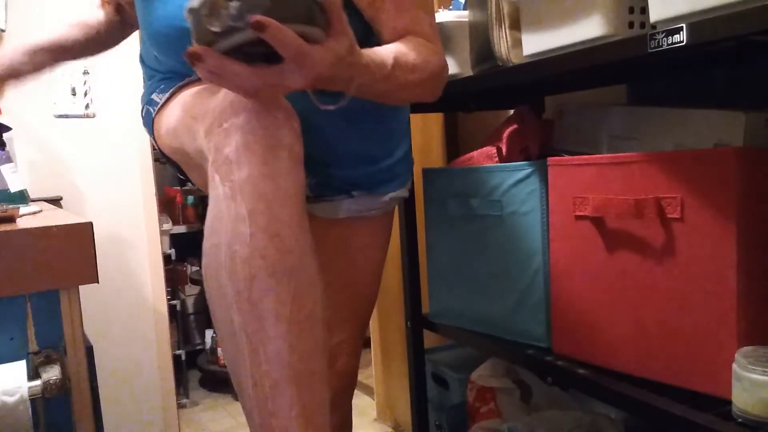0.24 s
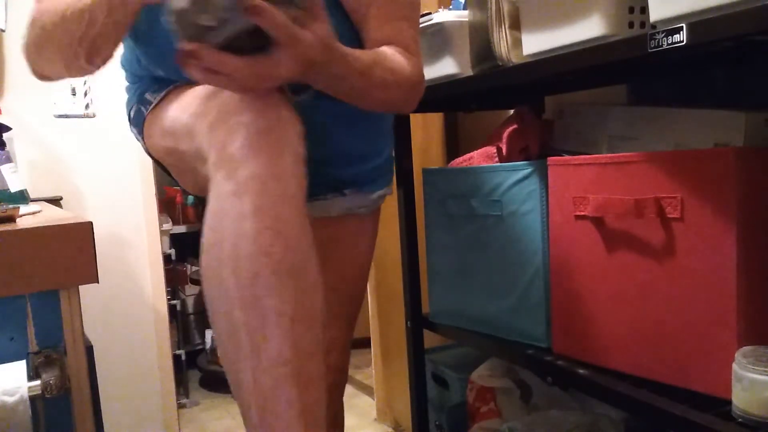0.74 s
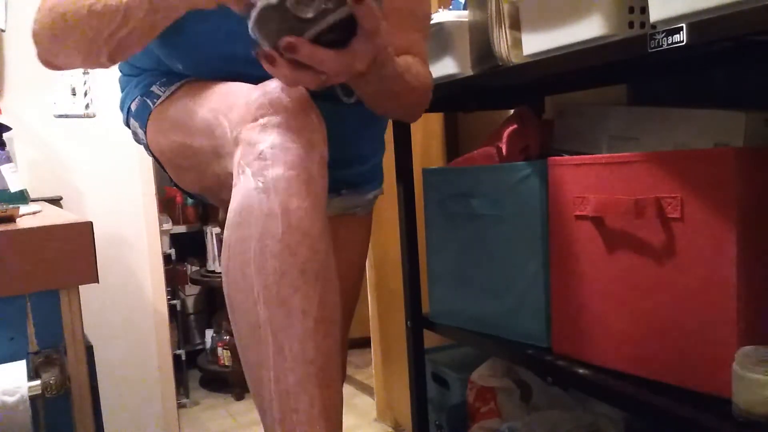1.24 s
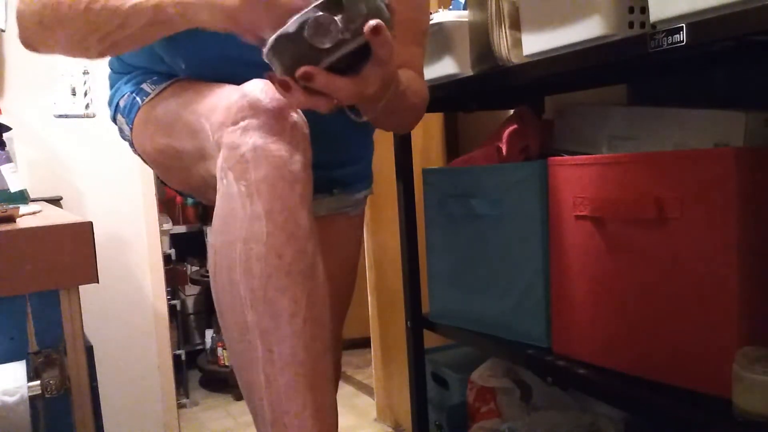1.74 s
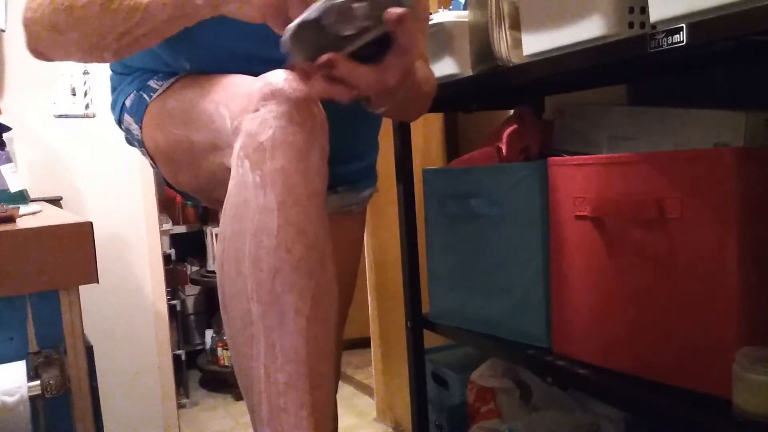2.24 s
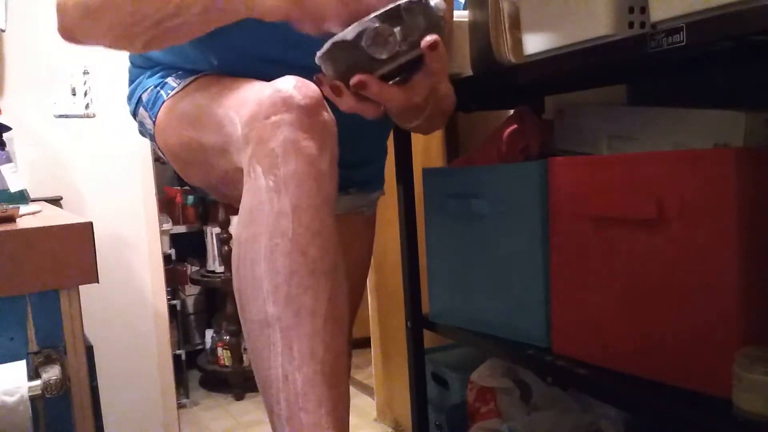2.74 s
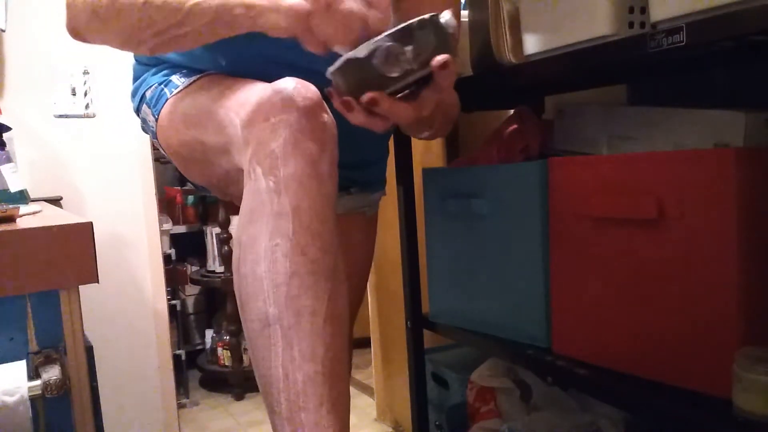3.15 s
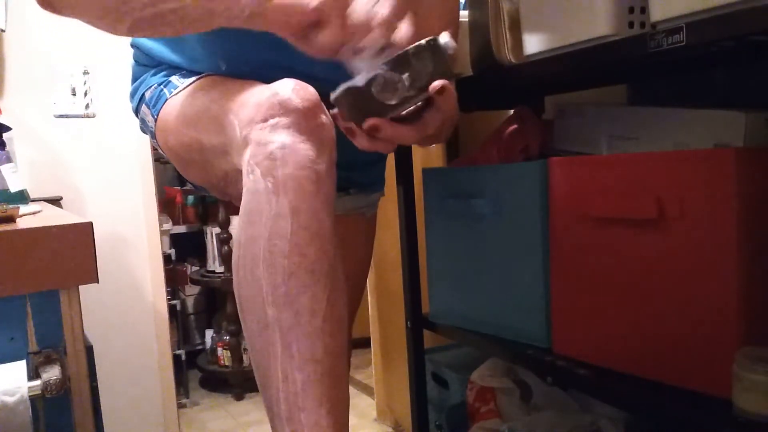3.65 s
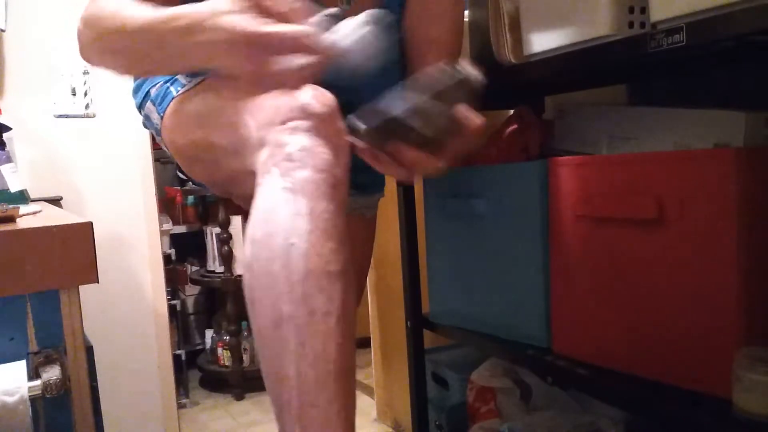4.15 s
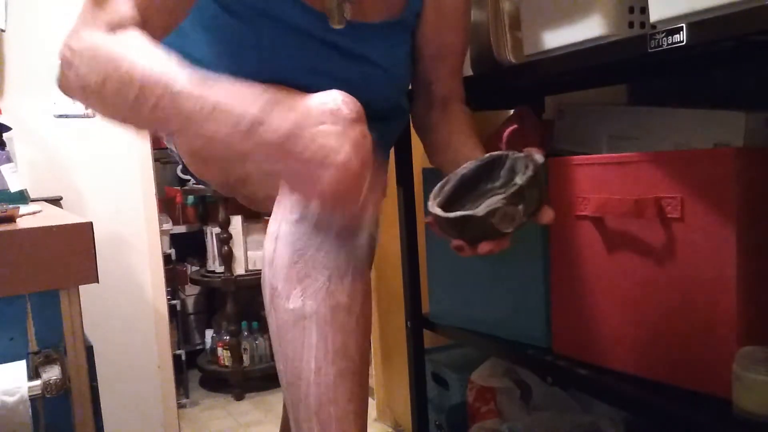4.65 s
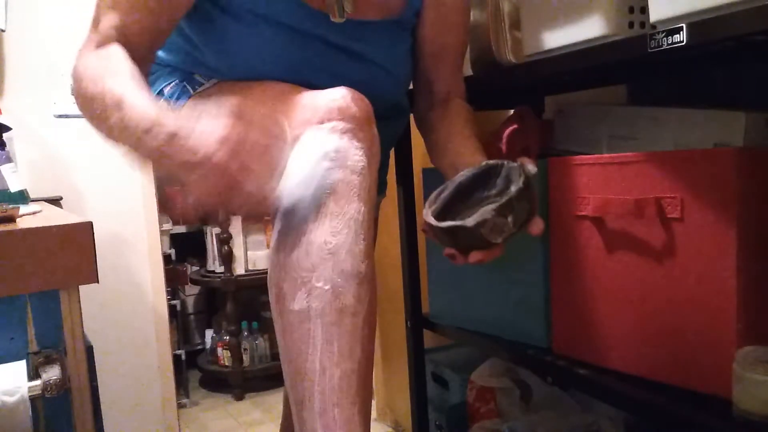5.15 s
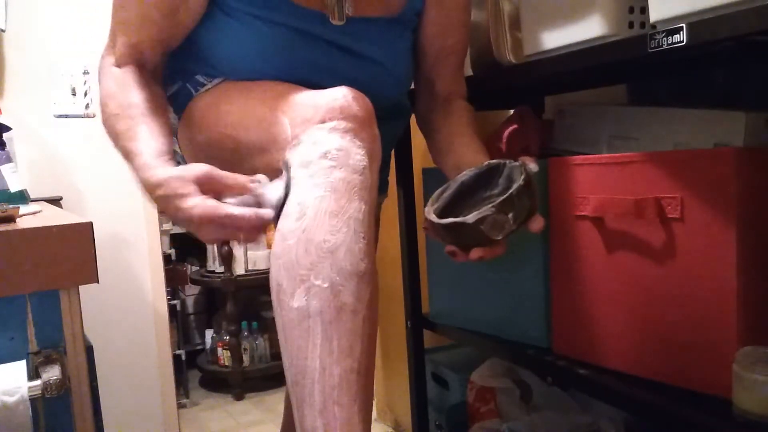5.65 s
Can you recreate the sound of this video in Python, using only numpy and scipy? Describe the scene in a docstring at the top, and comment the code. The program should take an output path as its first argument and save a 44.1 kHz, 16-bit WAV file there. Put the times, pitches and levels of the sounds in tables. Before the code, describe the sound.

Close, hollow-sounding stereo pickup of a shaving brush whisking lather in a bowl: scratchy wet to-and-fro swishes with foam fizz. The handle cracks against the bowl twice, the first knock loudest, each with a very short ring. After four seconds the brush dabs and scrubs bare skin more softly, ending in slow sweeps over low room hum and hiss.

```python
"""A shaving brush swirls in a soap bowl, then works over a lathered leg, in a small room.
It lands with soft pops and scrubs quickly; light handle taps lead to hard knocks on the bowl at 1.3 and 2.0 s.
More scrubbing and slow sweeps follow; from 4 s the brush pops, scrubs and sweeps on the leg.
Strokes are filtered grains of noise, knocks are a filtered click plus ringing tones, landings are short noise.
Room echoes and steady noise surround it all; a camera's stereo widening hollows the sound."""
import sys
import numpy as np
from scipy import signal
from scipy.fft import rfft, irfft
from scipy.io import wavfile

SR = 44100
rng = np.random.default_rng(int(sys.argv[2]) if len(sys.argv) > 2 else 0)


def int16_out(signal):
    """Quantize to a 16-bit WAV file."""
    q = np.round(np.clip(np.atleast_2d(signal).T, -1, 1) * 32767)
    wavfile.write(sys.argv[1], SR, q.astype(np.int16))


N = 259749  # length in samples
TIME = np.arange(N) / SR  # seconds


def amp(db):
    """Turns decibels into a plain multiplier."""
    return 10 ** (np.asarray(db) / 20)


def unit(x):
    """Scales to rms 1."""
    return x / np.sqrt(np.mean(x ** 2) + 1e-20)


def read(points, hz):
    """Joins points by straight lines on a log-frequency axis."""
    f, value = np.transpose(points)
    return np.interp(np.log(hz + 1), np.log(f + 1), value)


def add(mix, s, sound):
    """Lays a sound into the mix at time s."""
    part = mix[round(s * SR):][:len(sound)]
    part += sound[:len(part)]


def colour(x, spectrum, peaks=(), size=4096):
    """Filters with a smooth spectrum and resonant peaks on top, with no sound ahead of its cause."""
    hz = abs(np.fft.fftfreq(size, 1 / SR))
    db = read(spectrum, hz)
    for f, width, gain in peaks:
        db = db + gain / (1 + (2 * (hz - f) / width) ** 2)
    # the Hilbert transform finds the phase that makes the filter respond as early as it can
    minimum_phase = np.exp(np.conj(signal.hilbert(np.log(amp(db)))))
    response = np.fft.ifft(minimum_phase).real
    return signal.oaconvolve(x, response[:size // 2])[:len(x)]


def drift(per_s):
    """Random wandering of rms 1, with per_s new values a second joined by straight lines."""
    knots = np.arange(0, N / SR + 1, 1 / per_s)
    return unit(np.interp(TIME, knots, rng.standard_normal(N)[:len(knots)]))


def diffuse(length, spacing_m=0.14, likeness=0.93):
    """White sound from all directions at two microphones: most alike at long wavelengths."""
    a, b = rfft(rng.standard_normal((2, length)))
    hz = np.fft.rfftfreq(length, 1 / SR)
    same = np.clip(likeness, 0, 1) * np.sinc(2 * hz * spacing_m / 343)  # 343 m/s: speed of sound
    other = same * a + np.sqrt(1 - same ** 2) * b
    return irfft(np.array([a, other]), length)


def grains(per_s, spread_db, smooth):
    """Tiny snaps of uneven size over the smooth hiss of countless smaller ones."""
    happens = rng.random(N) < per_s / SR
    sign = rng.choice([-1, 1], N)
    size = amp(spread_db * np.minimum(rng.exponential(1, N), 4))
    return unit(unit(happens * sign * size) + smooth * rng.standard_normal(N))


# Single sweeps and slow presses. Each row: time of its height in seconds, level in dB before the brush gains,
# nominal length in seconds, bristle fizz in dB relative to the swish.
SINGLE_SWEEPS = [(0.49, -57, 0.32, -0.5), (1.965, -51.5, 0.36, -3), (3.42, -55.5, 0.39, 3.5),
                 (3.6, -54.5, 0.4, -2), (3.86, -62, 0.34, -18), (4.046, -55.5, 0.06, 0.5),
                 (4.16, -56, 0.24, 1.5), (5.345, -57.5, 0.079, 4.5), (5.49, -58, 0.28, 0.5),
                 (5.677, -52, 0.054, -4), (5.81, -56.5, 0.51, 3)]
# Spells of scrubbing to and fro. Each row: first stroke in seconds, last stroke in seconds, number of strokes,
# quickening from 0 to 1, extra return-stroke level in dB, bristle fizz in dB relative to the swish.
SCRUB_SPELLS = [(0.575, 1.267, 9, 0.03, -4.5, -5.5), (1.425, 1.882, 5, 0.08, -2, -5),
                (2.171, 3.141, 11, 0.1, -2.5, -3.5), (4.279, 5.193, 11, 0.06, 0.5, -2)]
# How hard the hand scrubs. Each row: time in seconds, level in dB before the return-stroke change and brush gains.
SCRUB_EFFORT = [(0.58, -44.5), (1.02, -43.5), (1.22, -38), (1.42, -48), (1.54, -45.5), (1.65, -51.5),
                (1.89, -48), (2.28, -44), (2.5, -46), (2.8, -42.5), (3.14, -48), (4.36, -45.5), (4.48, -52),
                (4.57, -45.5), (4.8, -52.5), (5.02, -51.5), (5.19, -58)]
SCRUB_SHARE = 0.81  # nominal length of a quick stroke as a share of the average beat


def strokes():
    """Lists the hand's motion: sweeps, and scrubs on a slowly quickening beat, return and push in turn."""
    rows = list(SINGLE_SWEEPS)
    for first, last, count, quickening, return_db, fizz_db in SCRUB_SPELLS:
        u = np.linspace(0, 1, round(count))
        beat_s = (last - first) * u[1]
        times = first + (last - first) * (u + quickening * u * (1 - u))
        for k, s in enumerate(times):
            level_db = np.interp(s, *np.transpose(SCRUB_EFFORT))
            if k % 2 == 0:
                level_db = level_db + return_db
            rows.append((s, level_db, SCRUB_SHARE * beat_s, fizz_db))
    return rows


# Tone of the wet swish. Each row: frequency in Hz, level in dB.
SWISH_TONE = [(100, -41), (300, -1), (480, -7), (650, 0.5), (800, -1.5), (950, -2.5), (1200, -1.5),
              (1600, -4.5), (2200, -5), (3000, -12.5), (5000, -13), (14000, -29.5)]
# Air in the bowl under the hand. Each row: frequency in Hz, width in Hz, boost or cut in dB.
BOWL_AIR = [(806.5, 28, 11), (1098, 27, 7), (1348, 200, 3), (2400, 1000, 3), (3950, 83, -6)]
# Tone of bristles and bursting foam. Each row: frequency in Hz, level in dB.
FIZZ_TONE = [(500, -12), (1500, -16.5), (2500, 4.5), (3400, 0.5), (4600, 2.5), (5700, -1.5), (7000, 0.5),
             (8500, -1.5), (10200, -1.5), (12500, -5.5), (14500, -10.5)]
ON_SKIN_S = 4.0  # the brush leaves the bowl for the leg
RISE_SHARE = 0.49  # part of a stroke spent swelling; it fades for the rest


def brush(swish_db=0.0, skin_db=-2.0, fizz_level_db=-2.5, clumping_db=2.5):
    """Each stroke swells and fades; clumps of bristles slip through the lather and foam bursts."""
    s, level_db, length, fizz_db = np.transpose(strokes())[:, :, None]
    rise, fall = length * RISE_SHARE, length * (1 - RISE_SHARE)
    t = np.linspace(0, N / SR, N // 32)  # coarse time steps are enough for the swelling
    u = (t - s) / np.maximum(np.where(t < s, rise, fall), .004)
    power = amp(level_db) ** 2 * np.exp(2 - 2 * np.sqrt(1 + (2 * u) ** 2))
    swish_level = np.interp(TIME, t, np.sqrt(power.sum(0)))
    fizz_level = np.interp(TIME, t, np.sqrt((power * amp(fizz_db) ** 2).sum(0)))

    clumps_db = clumping_db * drift(per_s=180)
    slips = grains(per_s=1300, spread_db=3.0, smooth=0.31) * amp(clumps_db)
    in_bowl = unit(colour(slips, SWISH_TONE, BOWL_AIR))
    on_skin = amp(skin_db) * unit(colour(slips, SWISH_TONE))
    swish = np.where(TIME < ON_SKIN_S, in_bowl, on_skin)

    bursts = grains(per_s=2500, spread_db=3.0, smooth=1.0) * amp(0.21 * clumps_db)
    fizz = unit(colour(bursts, FIZZ_TONE))
    return amp(swish_db) * swish_level * swish + amp(fizz_level_db) * fizz_level * fizz


# The handle meets the bowl. Each row: start in seconds, force in dB, crack in dB, ring in dB,
# brightness in dB per octave; crack and ring are set before the overall gains below.
HANDLE_HITS = [(0.666, -37, -3.5, 4, 7), (0.9343, -34.5, -3.5, 3, 9.5), (1.12, -41, -3, 5, 11.5),
               (1.162, -41, -1, -2, -7), (1.2942, -4, 1.5, 8.5, 2), (2.0045, -10, 4, 11.5, 1)]
# The bowl wall's tones. Each row: frequency in Hz, level in dB before brightness and gains,
# time in seconds to fall by 60 dB.
BOWL_TONES = [(1770, -25, 0.026), (2260, -1, 0.15), (2210, 2.5, 0.1), (2442, 0.5, 0.045),
              (2630, -2.5, 0.015), (4630, -22.5, 0.026), (4425, 3, 0.039), (4460, -18, 0.019),
              (7600, -22, .012), (9470, -11.5, 0.023), (9960, -22, 0.021), (11960, -21, .01)]
# Tone of the dry crack. Each row: frequency in Hz, level in dB before brightness.
CRACK_TONE = [(20, -61), (100, -40), (230, -2), (450, 2.5), (700, 4.5), (1200, -9.5), (1900, 10), (2900, 4),
              (4400, 2), (5300, -1.5), (6400, 3), (8000, -10.5), (9000, -10.5), (9900, -13.5), (11200, -34),
              (14000, -19.5)]


def knocks(thud_db=8, ring_db=-24, rebound_s=.00068, rebound=-0.11):
    """The handle hits and chatters once: a dry crack, then the bowl's short ring, brighter or duller by hit."""
    out, t = np.zeros(N), np.arange(SR // 4) / SR
    hz, mode_db, t60 = np.transpose(BOWL_TONES)[:, :, None]
    pivot_hz = BOWL_TONES[1][0]  # brightness tilts the sound around this tone
    contact = np.zeros(len(t))
    contact[0] = 1
    add(contact, rebound_s, np.array([rebound]))
    for s, force_db, crack_db, wall_db, tilt_db in HANDLE_HITS:
        tilted = [(f, db + tilt_db * np.log2(f / pivot_hz)) for f, db in CRACK_TONE]
        crack = colour(contact, tilted)
        tone_db = mode_db + tilt_db * np.log2(hz / pivot_hz) - 60 * t / t60
        ring = (amp(tone_db) * np.sin(2 * np.pi * hz * t)).sum(0)
        hit = amp(thud_db + crack_db) * crack + amp(ring_db + wall_db) * ring
        add(out, s, amp(force_db) * hit)
    return out


# The wet tuft lands. Each row: start in seconds, level in dB before size_db,
# time in seconds for the squelch to fall to 37 percent.
TUFT_LANDINGS = [(0.353, -50, 0.011), (0.446, -45, 0.0091), (1.525, -52, 0.018), (4.023, -43, 0.0058),
                 (4.041, -44, 0.01), (4.059, -46.5, 0.0048), (4.226, -49, 0.016), (4.489, -46.5, 0.022),
                 (5.68, -46.5, 0.0063)]
# Tone of the landing. Each row: frequency in Hz, level in dB.
PLOP_TONE = [(100, -20), (350, -16), (620, 1), (850, -4), (1500, -20.5), (4000, -25), (14000, -23)]


def dabs(size_db=12, pop=9):
    """The loaded tuft lands with a soft pop and a low squelch."""
    out, t = np.zeros(N), np.arange(SR // 8) / SR
    for s, level_db, decay in TUFT_LANDINGS:
        squelch = np.exp(-t / decay) * rng.standard_normal(len(t))
        squelch[0] = pop
        add(out, s, amp(level_db) * squelch)
    return amp(size_db) * colour(out, PLOP_TONE)


# How long echoes last. Each row: frequency in Hz, time in seconds to fall by 60 dB.
ECHO_TIMES = [(100, 0.08), (500, 0.16), (1200, 0.19), (2300, 0.19), (5000, 0.22), (10000, 0.23),
              (15000, 0.38)]


def echoes(build_s):
    """Close walls and shelves answer within milliseconds; each pitch range dies at its own rate."""
    hz, t, z = signal.stft(diffuse(SR // 3), SR, nperseg=256)
    fade = amp(-60 * t / read(ECHO_TIMES, hz)[:, None])
    tail = signal.istft(z * fade, SR, nperseg=256)[1]
    after_s = np.arange(tail.shape[1]) / SR
    tail = tail * (1 - np.exp(-(after_s / build_s) ** 2))
    return tail / np.linalg.norm(tail, axis=1, keepdims=True)


def room(x, direct_db, wet_db, build_s, count):
    """Straight sound reaches both microphones together; the echoes shift as the hand and body move."""
    places = np.array([drift(per_s=10) for _ in range(count)])
    places = places / np.linalg.norm(places, axis=0)  # the shares keep a constant total power
    wet = np.zeros((2, N))
    for share in places:
        wet += signal.oaconvolve((x * share)[None], echoes(build_s), axes=1)[:, :N]
    return amp(direct_db) * x + amp(wet_db) * wet


# The still room before stereo widening. Each row: frequency in Hz, level in dB per Hz before the drone peaks.
ROOM_NOISE = [(20, -102), (40, -83), (60, -78.5), (90, -82.5), (180, -84.5), (300, -86.5), (480, -88),
              (750, -96.5), (1500, -102), (3000, -104), (6000, -106), (8200, -107), (10000, -111),
              (14000, -114)]
# Resonances in the room noise. Each row: frequency in Hz, width in Hz, boost in dB.
ROOM_DRONE = [(280, 40, 4.5), (340, 10.4, 8.5)]


def background():
    """Low room noise with a faint drone, and microphone hiss, as one filtered noise at each microphone."""
    sides = [colour(side, ROOM_NOISE, ROOM_DRONE, size=16384) for side in diffuse(N, likeness=0.37)]
    return np.array(sides) * np.sqrt(SR / 2)  # makes the table's levels count per Hz


def gain_control(x, threshold_db=-27, share=0.6, recover_db_per_s=8, attack_s=0.011):
    """A loud sound quickly pulls the gain down; it then creeps back at a steady rate in dB."""
    keep = np.exp(-1 / (SR * attack_s))
    power = signal.lfilter([1 - keep], [1, -keep], (x ** 2).mean(0))
    cut_db = share * np.maximum(10 * np.log10(power + 1e-12) - threshold_db, 0)
    recovery_db = recover_db_per_s * TIME
    held_db = np.maximum.accumulate(cut_db + recovery_db) - recovery_db
    return x * amp(-signal.lfilter([1 - keep], [1, -keep], held_db))


def scene():
    """Places the brush, its landings and the knocks in the room, over the background."""
    rubbing = room(brush(), direct_db=-4.5, wet_db=0.5, build_s=0.0022, count=8)
    landing = room(dabs(), direct_db=0.5, wet_db=2, build_s=.003, count=1)
    knocking = room(knocks(), direct_db=1.0, wet_db=6.0, build_s=0.00075, count=2)
    return rubbing + landing + knocking + background()


# Right microphone subtracted from the left side. Each row: frequency in Hz, amount in dB.
RIGHT_INTO_LEFT = [(100, -2), (1100, -1), (2300, 1), (3400, -3.5), (4550, -6), (6000, -12), (8000, -31),
                   (14000, -34)]
# Left microphone subtracted from the right side. Each row: frequency in Hz, amount in dB.
LEFT_INTO_RIGHT = [(100, -2.5), (1100, -3.5), (2300, 0.6), (3400, -0.5), (4550, -5), (6000, -4),
                   (8000, -13.5), (14000, -14)]
CROSS_DELAY_S, EDGE_HZ = 0.000439, 14300  # delay of the subtracted copy, top of the band


def record(dry):
    """Widening subtracts a delayed copy of the opposite microphone; then gain control, soft limit and band limit."""
    hz = np.fft.rfftfreq(N, 1 / SR)
    left, right = rfft(dry)
    late = np.exp(-2j * np.pi * hz * CROSS_DELAY_S)
    wide_left = left - amp(read(RIGHT_INTO_LEFT, hz)) * late * right
    wide_right = right - amp(read(LEFT_INTO_RIGHT, hz)) * late * left
    wide = irfft(np.array([wide_left, wide_right]), N)
    held = np.tanh(gain_control(wide))
    low_pass = signal.firwin(601, EDGE_HZ, window=("kaiser", 8), fs=SR)
    return signal.oaconvolve(held, low_pass[None], "same")


dry = scene()
out = record(dry)
int16_out(out)
```